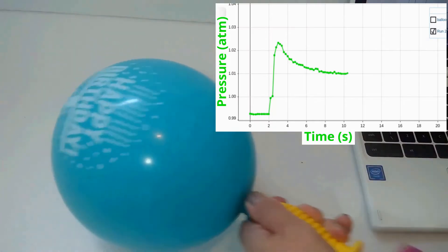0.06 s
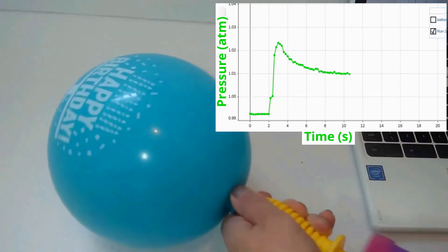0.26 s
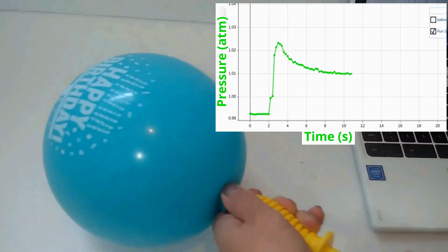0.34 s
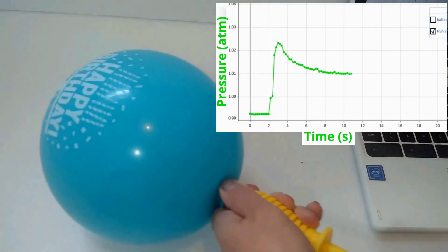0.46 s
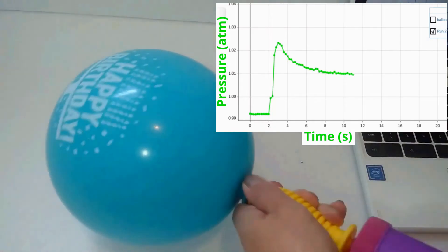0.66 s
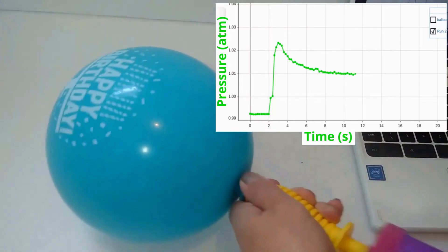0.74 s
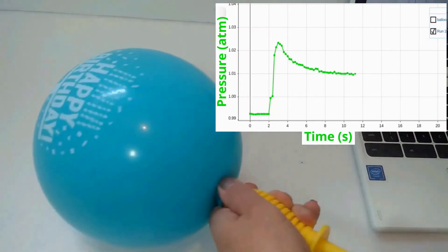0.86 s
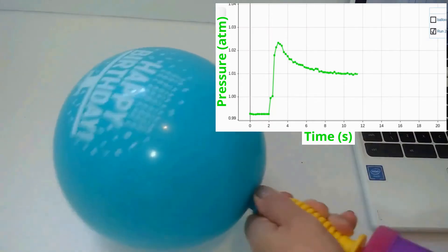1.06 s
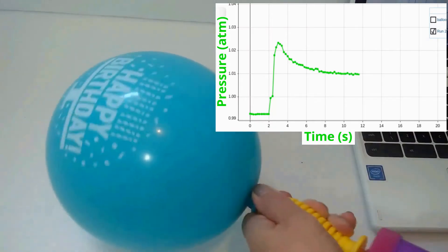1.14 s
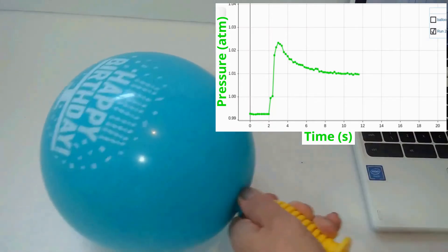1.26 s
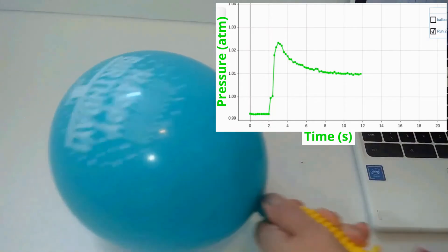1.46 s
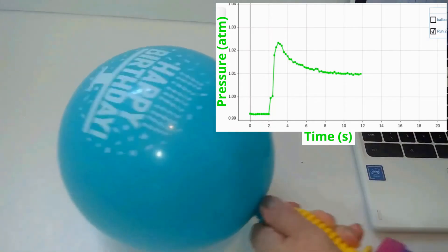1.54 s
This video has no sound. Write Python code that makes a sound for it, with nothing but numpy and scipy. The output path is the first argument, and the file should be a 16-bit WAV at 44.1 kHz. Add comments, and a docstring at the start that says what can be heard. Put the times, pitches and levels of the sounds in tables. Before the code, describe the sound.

A plastic hand pump inflates a balloon in a small room, about two strokes a second. Each stroke starts with a soft intake hiss and a dull bump, then air rushes until a sharp knock, at about 0.4, 0.8 and 1.3 seconds. The taut balloon rings briefly after each knock. A last soft intake comes around 1.5 seconds, with faint hand rustles and low room hiss underneath.

```python
"""Pumping up a balloon

A plastic hand pump inflates a rubber balloon in a small room, about two strokes a second.
The piston is drawn back with a soft intake hiss and turns with a dull bump; then a turbulent jet rushes
through the nozzle until the piston knocks against the end of the barrel. Both impacts excite the
normal modes of the barrel and of the taut balloon, which rings briefly."""
import sys
import numpy as np
from scipy import signal
from scipy.io import wavfile

SR = 44100
rng = np.random.default_rng(int(sys.argv[2]) if len(sys.argv) > 2 else 0)


def output_pcm(signal):
    """Save a mono or channel-first signal as 16-bit PCM at the path in sys.argv[1].

    Samples are clipped to [-1, 1] before scaling.
    """
    pcm = np.clip(np.atleast_2d(signal).T, -1, 1) * 32767
    wavfile.write(sys.argv[1], SR, np.round(pcm).astype(np.int16))


N = 70560
TIME = np.arange(N) / SR

# normal modes of the balloon and of the plastic barrel: f/Hz, relative level/dB, T60/s
BALLOON_MODES = [(72.6, -44.5, 1), (101.4, -41, 0.29), (129.5, -40.5, 0.22), (187.5, -42.5, 0.099),
                 (213, -39, .17), (244, -42, .16), (277, -47, .18), (308, -39, .19), (336, -45, .12),
                 (397, -44, .17), (428, -48, .12), (471, -36.5, 0.043), (589.6, -57, 0.34),
                 (659, -52.5, .13), (695, -37.5, 0.024), (754, -49, 0.042)]
BARREL_MODES = [(720, -28, 0.0066), (968, -35.5, 0.028), (1490, -43.5, 0.028), (1780, -56, 0.14),
                (2040, -55, 0.15), (2240, -51.5, 0.097), (2407, -31, 0.012), (4140, -44.5, 0.041)]
# stereo balance of all noise: f/Hz, left minus right/dB
NOISE_BALANCE = [(100, -2.5), (370, 1.5), (700, 0.5), (1300, -1), (2300, -0.5), (4300, -4.5), (8000, -4.5),
                 (13000, 2.5)]


def from_db(db):
    """Amplitude ratio of a level in decibels."""
    return 10 ** (np.asarray(db) / 20)


def unit_rms(x):
    """Normalisation to unit mean power."""
    return x / np.sqrt(np.mean(x ** 2) + 1e-20)


def at_hz(curve, hz):
    """Interpolation on a logarithmic frequency axis."""
    frequencies, values = np.array(curve).T
    return np.interp(np.log(hz), np.log(frequencies), values)


def pan(db):
    """Left and right gains for an interchannel level difference."""
    return from_db([[db / 2], [-db / 2]])


def bell(t, width_s):
    """Gaussian envelope centred on time t."""
    return np.exp(-.5 * ((TIME - t) / width_s) ** 2)


def decay(t, t60):
    """Exponential damping: unity until time t, then 60 dB down every t60 seconds."""
    return np.exp(-np.log(1000) * np.maximum(TIME - t, 0) / t60)


def filtered(x, kind, hz, order=2):
    """Maximally flat low-, high- or band-pass filter."""
    return signal.sosfilt(signal.butter(order, hz, kind, fs=SR, output="sos"), x + 1e-18)


def noise(spectrum, t60s=None):
    """Partly coherent stereo noise of unit rms, steady or damped band by band."""
    # likeness of the two channels: f/Hz, correlation coefficient
    correlation = [(60, 0.1), (150, 0.7), (300, 0.86), (630, 0.28), (1400, -0.2), (3000, 0.08),
                   (6700, -0.06), (14000, 0)]
    edges = np.geomspace(28, 17000, 25)
    out, white = 0, rng.standard_normal((2, 2, N))
    for k, (low, high) in enumerate(zip(edges, edges[1:])):
        mid, side = filtered(white[k % 2], "band", [low, high])
        hz = np.sqrt(low * high)
        alike = at_hz(correlation, hz)
        band = np.sqrt(1 + alike) * mid + np.sqrt(1 - alike) * side * [[1], [-1]]
        gain = from_db(at_hz(spectrum, hz)) * pan(at_hz(NOISE_BALANCE, hz))
        fade = decay(0, at_hz(t60s, hz)) if t60s else 1
        out = out + gain * band * fade
    return unit_rms(out)


def resonance(hz, width_hz):
    """Random excitation of a resonator: narrow-band noise of unit rms."""
    b, a = signal.iirpeak(hz, hz / width_hz, fs=SR)
    band = signal.lfilter(b, a, signal.lfilter(b, a, rng.standard_normal((2, N))))
    return unit_rms(band * pan(at_hz(NOISE_BALANCE, hz)))


def ring(blows, modes, spread_db=1.97, lean_db=3):
    """Modal superposition: each blow (t/s, level/dB) starts damped sines, varied in level and side."""
    # stereo balance of the ringing: f/Hz, left minus right/dB
    balance = [(130, 2.5), (300, -7.5), (700, 0.5), (2500, -2)]
    out = np.zeros((2, N))
    for t, db in blows:
        age = np.maximum(TIME - t, 0)
        for hz, mode_db, t60 in modes:
            strength, lean = rng.standard_normal(2)
            gain = from_db(db + mode_db + spread_db * strength) * pan(at_hz(balance, hz) + lean_db * lean)
            out += gain * np.sin(2 * np.pi * hz * age) * decay(t, t60)
    return out


def room_hiss():
    """Stationary broadband noise: the faint background of the room."""
    # background spectrum: f/Hz, relative density level/dB
    spectrum = [(30, 5), (60, -10.5), (110, 1.5), (300, -5.5), (600, -9), (1200, -11), (2000, -10),
                (4500, -11.5), (8000, -18), (14000, -25)]
    return from_db(-60) * noise(spectrum)


def reverberation(x, delay_s=0.0013):
    """Convolution with the room's short diffuse response, which lasts longest in the bass."""
    # reverberation time: f/Hz, T60/s
    t60s = [(80, 0.72), (400, 0.2256), (2000, 0.33), (10000, 0.26)]
    # initial spectrum of the tail: f/Hz, relative density level/dB
    spectrum = [(60, -6), (300, 6), (700, 10), (1300, 5), (2200, 6), (5000, -2), (14000, 0)]
    onset = np.clip(TIME / delay_s - 1, 0, 1)
    response = noise(spectrum, t60s) * onset / np.sqrt(N)
    return from_db(-13.5) * signal.fftconvolve(x, response, axes=1)[:, :N]


def handling():
    """Friction noise: the hand shifts on the balloon's neck with soft, low rustles."""
    # shifts of the hand: t/s, level/dB
    shifts = [(0.14, -62.5), (0.766, -58.5), (0.834, -52.5), (0.939, -60.5), (1.10, -81), (1.246, -55.5),
              (1.43, -62.5)]
    # rustle spectrum: f/Hz, relative density level/dB
    spectrum = [(40, -28), (90, -2.5), (200, -9), (330, -16), (500, -4), (1000, -41), (14000, -65)]
    return sum(from_db(db) * bell(t, width_s=0.021) for t, db in shifts) * noise(spectrum)


def intake():
    """Flow noise follows the piston's speed on the back stroke; the valve whistles and the seal rubs."""
    # back strokes: start t/s, fastest t/s, end t/s, peak level/dB
    draws = [(-0.03, 0.173, 0.2, -57), (0.472, 0.627, 0.66, -56), (0.937, 1.048, 1.134, -57),
             (1.403, 1.532, 1.59, -57)]
    # inflow spectrum: f/Hz, relative density level/dB
    spectrum = [(60, -37), (300, -3), (700, -3.5), (1200, -10), (1750, 2.5), (2700, 0.5), (4600, 3),
                (6000, -2), (9000, -5.5), (14000, -16)]
    # faint whistles of the valve: t/s, f/Hz, level/dB
    whistles = [(0.598, 4780, -56), (1.06, 4660, -57)]
    # friction of the seal in the barrel: t/s, level/dB
    rubs = [(0.05, -62), (0.13, -63.5), (0.512, -60.5), (0.58, -63.5), (0.651, -63), (0.965, -63),
            (1.04, -65), (1.11, -60.5), (1.431, -58), (1.52, -67)]
    flow = sum(from_db(db) * np.interp(TIME, times, [0, 1, 0]) ** 0.52 for *times, db in draws)
    whistle = sum(from_db(db) * bell(t, width_s=.013) * resonance(hz, width_hz=200)
                  for t, hz, db in whistles)
    friction = sum(from_db(db) * bell(t, width_s=.02) for t, db in rubs)
    rub = friction * resonance(hz=1750, width_hz=480)
    return flow * noise(spectrum) + whistle + rub


def nozzle_jet(swell_db_per_s=45.5):
    """A turbulent jet drives the balloon's cavity resonances, swelling through each push."""
    # forward strokes: start t/s, rise time/s, end t/s, final level/dB
    pushes = [(0.252, .034, 0.35, -42), (0.727, 0.042, 0.8346, -42.5), (1.174, 0.033, 1.2655, -42.5)]
    # jet spectrum: f/Hz, relative density level/dB
    spectrum = [(60, -6), (200, -13.5), (800, -7), (1500, -4.5), (2300, -2.5), (3100, -5), (4300, 2.5),
                (5700, -6.5), (7700, -3), (10000, -11.5), (14000, -17)]
    # resonances of the enclosed air: f/Hz, bandwidth/Hz, level re jet/dB
    cavity_modes = [(2010, 60, -21), (2230, 160, -18), (2470, 90, -20), (2930, 35, -16), (3475, 60, -18),
                    (3750, 110, -19), (4020, 70, -18), (4250, 130, -14), (4680, 160, -16), (5000, 80, -19),
                    (6100, 80, -21), (7320, 200, -18), (7950, 130, -19)]
    flow = 0
    for start, rise, end, db in pushes:
        opening = np.clip((TIME - start) / rise, 0, 1) ** 1.3
        swell = from_db(db + swell_db_per_s * np.minimum(TIME - end, 0))
        flow = flow + opening * swell * decay(end, t60=0.22)
    jet = noise(spectrum)
    cavity = sum(from_db(db) * resonance(hz, width) for hz, width, db in cavity_modes)
    return flow * (jet + cavity)


def cracks(contacts, hold_s=.0015):
    """Impact noise: each brief contact (t/s, level/dB) of plastic on plastic gives a bright burst."""
    # contact spectrum: f/Hz, relative density level/dB
    spectrum = [(60, -24), (800, 5), (2300, 3.5), (3100, -4.5), (4200, 5), (5500, -10.5), (7500, 1),
                (9300, -4), (14000, -18)]
    envelope = sum(from_db(db) * (TIME >= t) * decay(t + hold_s, t60=.007) for t, db in contacts)
    return envelope * noise(spectrum) * pan(-4)


def back_stop(lead_s=0.00033, tug_lag_s=0.00043, tug_s=0.00188, wobble_hz=74.7):
    """A soft impact excites mainly low modes: a dull bump with a tug on the balloon and a faint tick."""
    # piston reaches the back stop: t/s, ringing level/dB, tick level/dB
    bumps = [(0.237, -8.5, -46.5), (0.703, -12, -46), (1.1592, -9, -43.5)]
    # the balloon wobbles as the push begins: t/s, level/dB
    wobbles = [(0.267, -52), (0.734, -48), (1.190, -48)]
    blows = [(t, db) for t, db, _ in bumps]
    balloon = ring([(t - lead_s, db) for t, db in blows], BALLOON_MODES)
    balloon = filtered(balloon, "low", hz=484, order=6)
    balloon = filtered(balloon, "high", hz=70)
    tug_times = [t + tug_lag_s for t, _ in blows]
    tug = from_db(-39) * sum((1 - ((TIME - t) / tug_s) ** 2) * bell(t, tug_s) for t in tug_times)
    wobble = sum(from_db(db) * np.cos(2 * np.pi * wobble_hz * (TIME - t)) * bell(t, width_s=0.014)
                 for t, db in wobbles)
    barrel = from_db(-7) * filtered(ring(blows, BARREL_MODES), "low", hz=1060)
    tick = cracks([(t, db) for t, _, db in bumps])
    return tick + barrel - balloon - tug - wobble


def front_stop(balloon_lag_s=0.002084, barrel_lead_s=0.000652, rebound_s=.0058, thud_lag_s=0.0053):
    """A hard impact cracks and sets barrel and balloon in free vibration; the piston rebounds once."""
    # piston hits the front stop: t/s, ringing level/dB, crack level/dB, rebound crack level/dB
    knocks = [(0.3599, 2, -30, -36), (0.8447, -0.5, -34.5, -42), (1.2821, -0.5, -28.5, -37.5)]
    blows = [(t + balloon_lag_s, db) for t, db, _, _ in knocks]
    contacts = [(t, db) for t, _, db, _ in knocks]
    rebounds = [(t + rebound_s, db) for t, _, _, db in knocks]
    barrel = ring([(t - barrel_lead_s, db) for t, db in blows], BARREL_MODES)
    rebound_thud = ring([(t + thud_lag_s, db - 18) for t, db, _, _ in knocks], BALLOON_MODES)
    balloon = ring(blows, BALLOON_MODES)
    ringing = filtered(balloon - barrel, "high", hz=135) + filtered(rebound_thud, "high", hz=312)
    return ringing + cracks(contacts + rebounds)


def scene():
    """Superposition of the direct sounds, the reverberation of the impacts and the room's hiss."""
    impacts = front_stop() + back_stop()
    return impacts + reverberation(impacts) + nozzle_jet() + intake() + handling() + room_hiss()


def record(dry):
    """Band limiting: a small microphone loses the deepest bass, and the top is cut steeply."""
    treble_cut = signal.ellip(10, .2, 80, 14300, fs=SR, output="sos")
    return signal.sosfilt(treble_cut, filtered(dry, "high", hz=44.4))


dry = scene()
out = record(dry)
output_pcm(out)
```